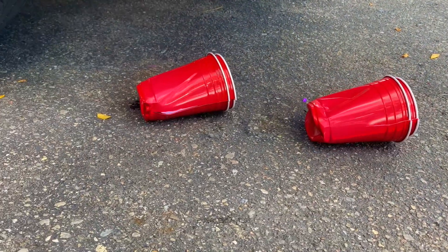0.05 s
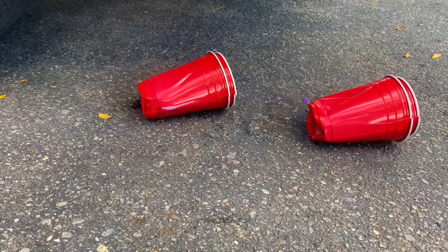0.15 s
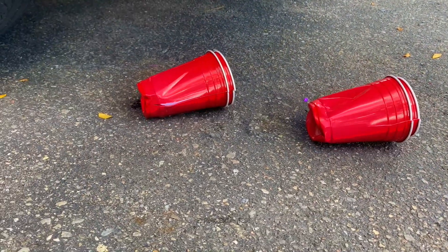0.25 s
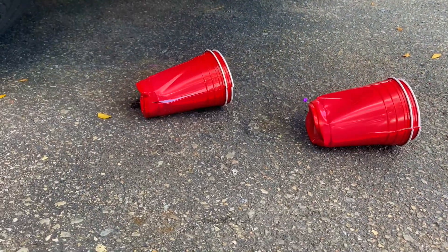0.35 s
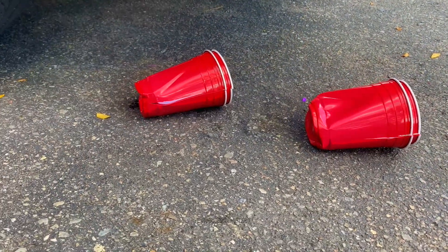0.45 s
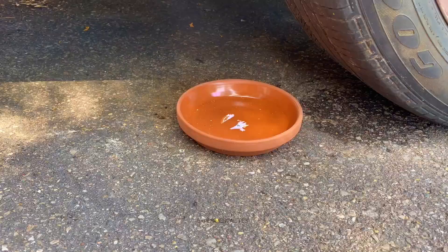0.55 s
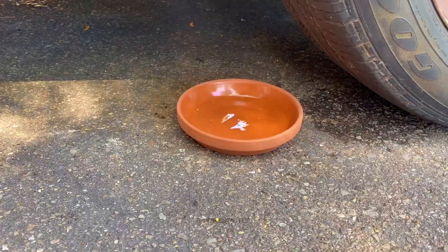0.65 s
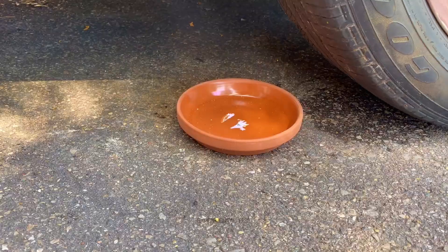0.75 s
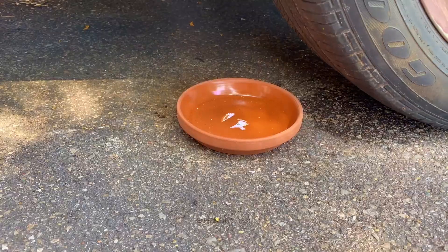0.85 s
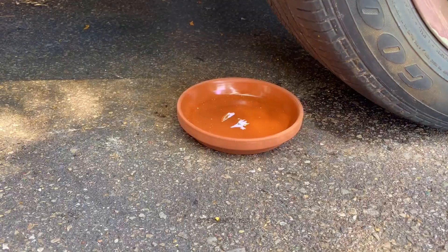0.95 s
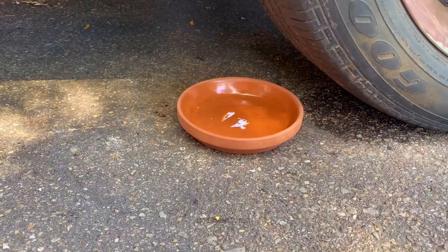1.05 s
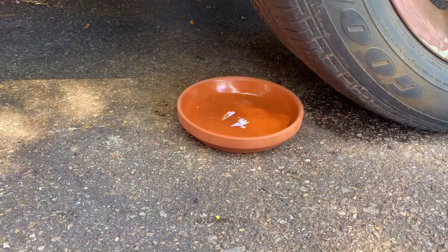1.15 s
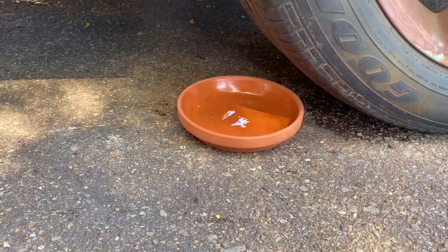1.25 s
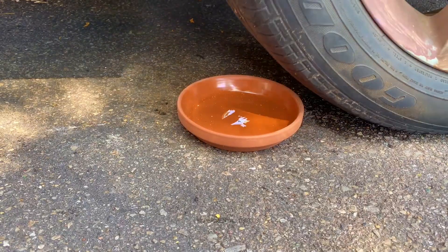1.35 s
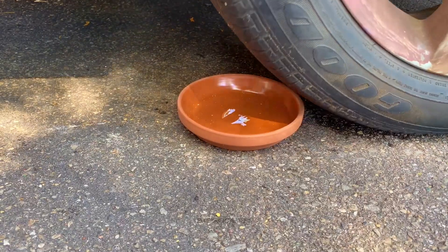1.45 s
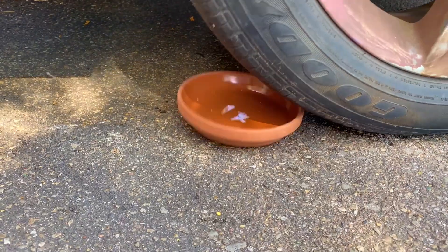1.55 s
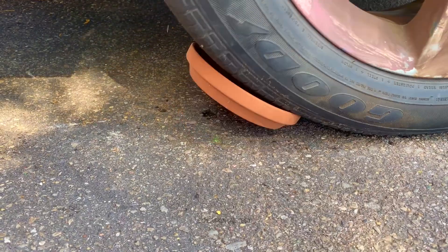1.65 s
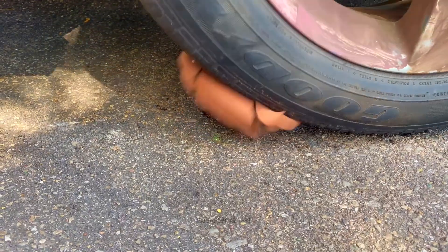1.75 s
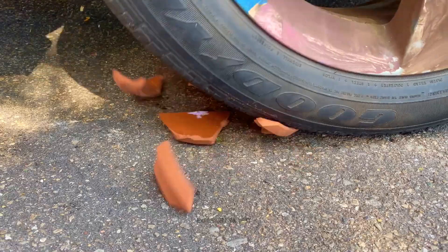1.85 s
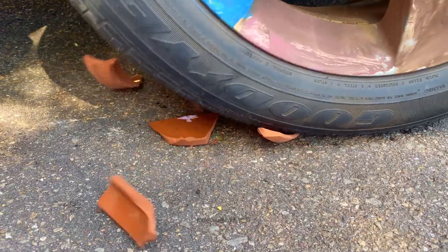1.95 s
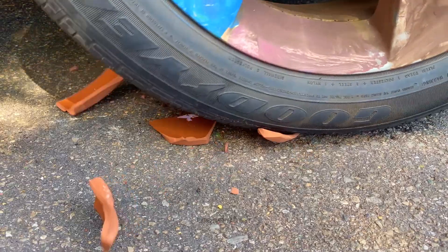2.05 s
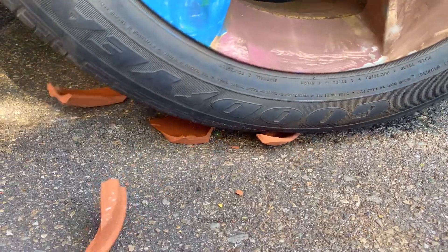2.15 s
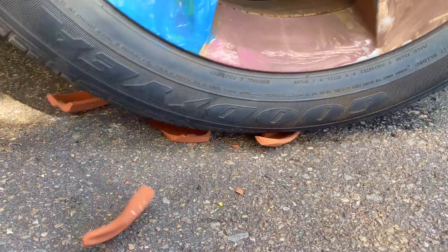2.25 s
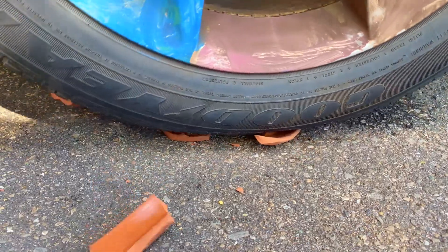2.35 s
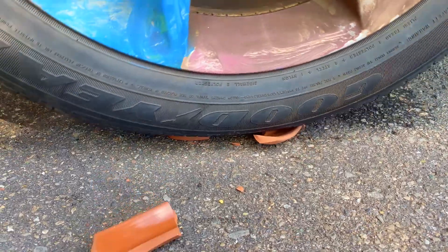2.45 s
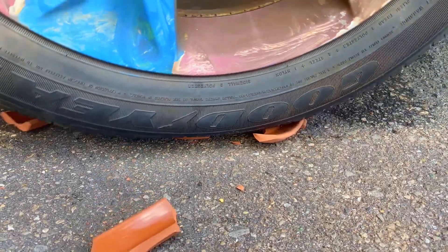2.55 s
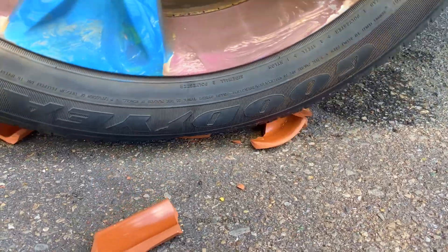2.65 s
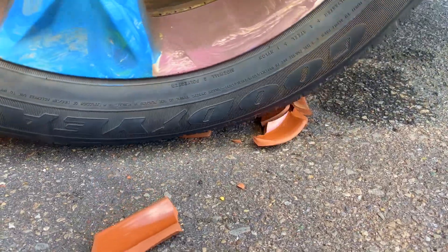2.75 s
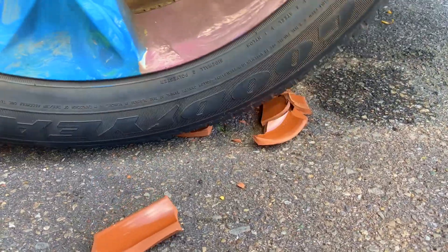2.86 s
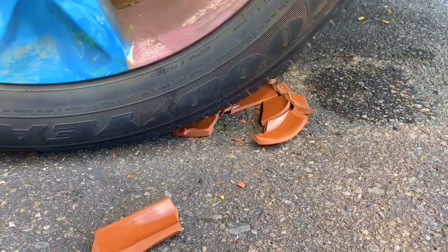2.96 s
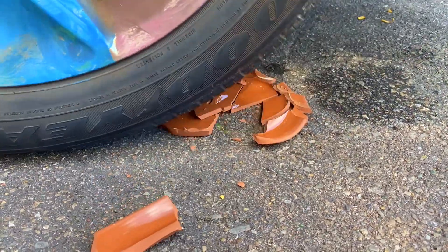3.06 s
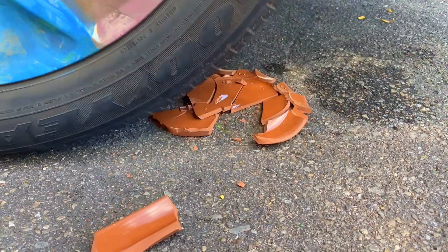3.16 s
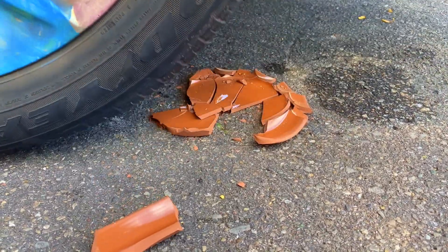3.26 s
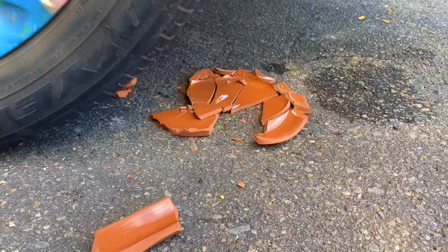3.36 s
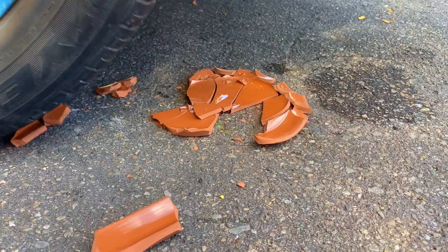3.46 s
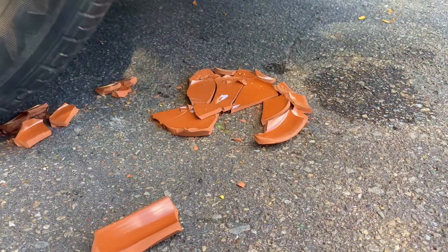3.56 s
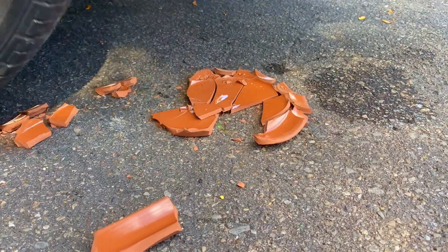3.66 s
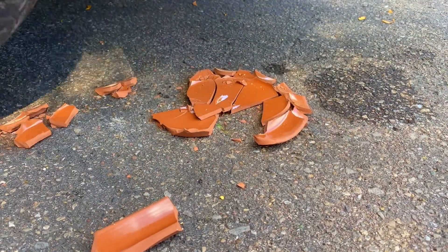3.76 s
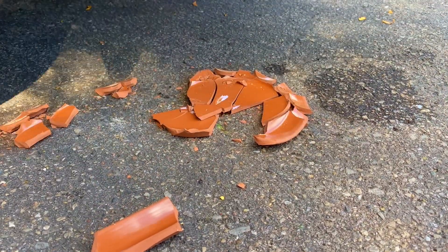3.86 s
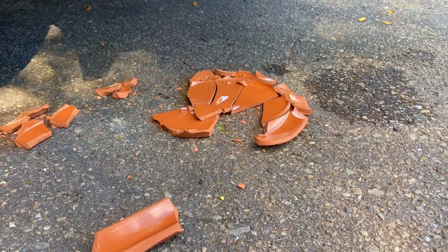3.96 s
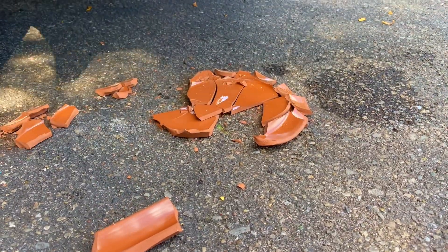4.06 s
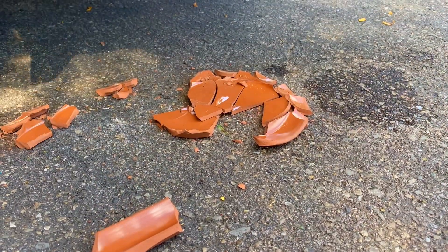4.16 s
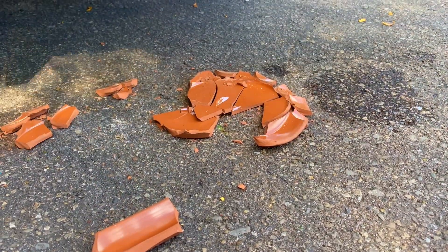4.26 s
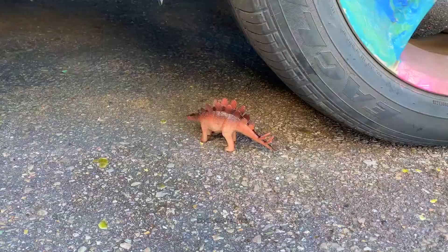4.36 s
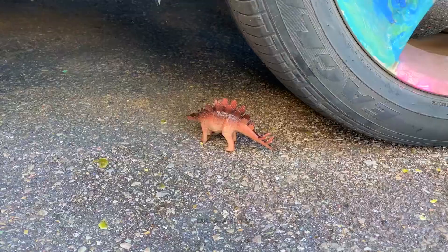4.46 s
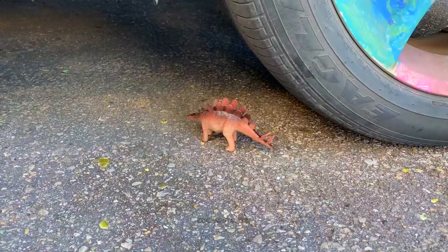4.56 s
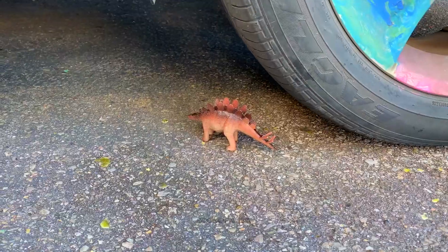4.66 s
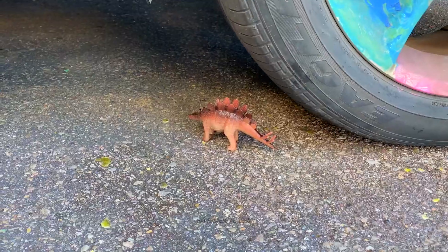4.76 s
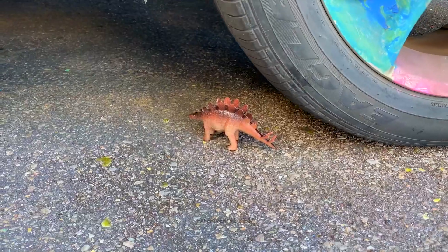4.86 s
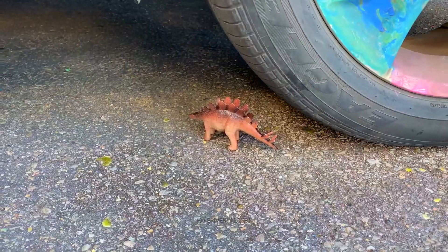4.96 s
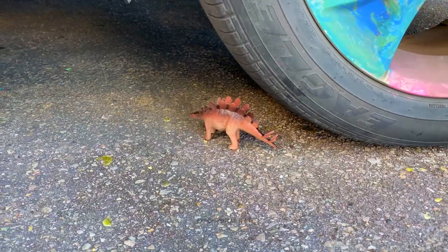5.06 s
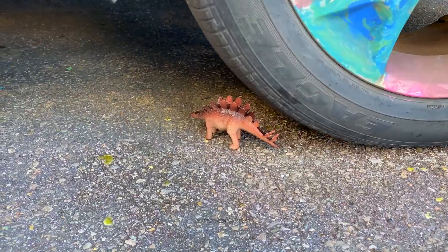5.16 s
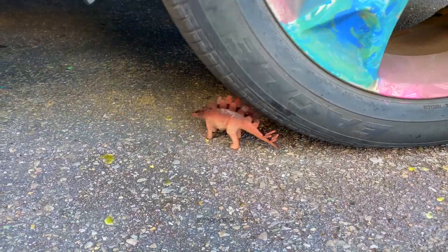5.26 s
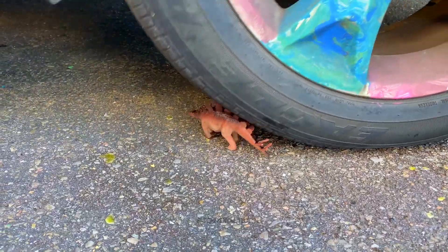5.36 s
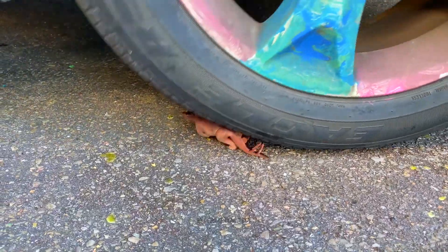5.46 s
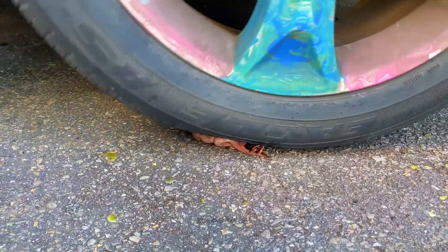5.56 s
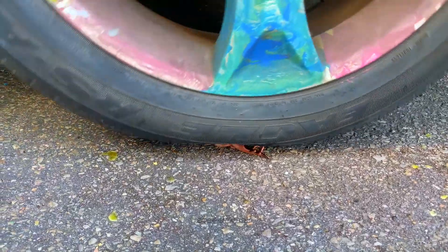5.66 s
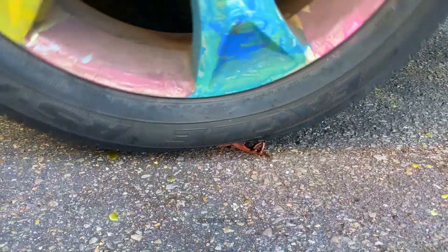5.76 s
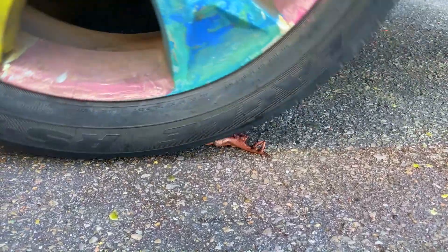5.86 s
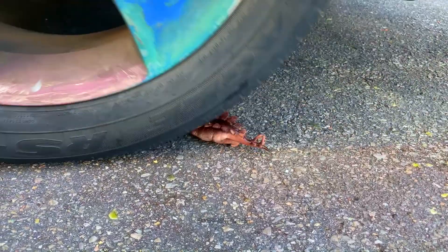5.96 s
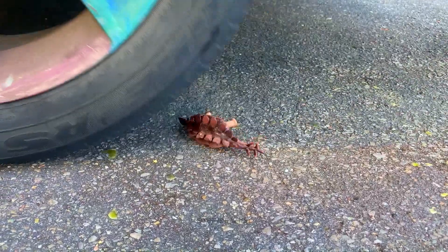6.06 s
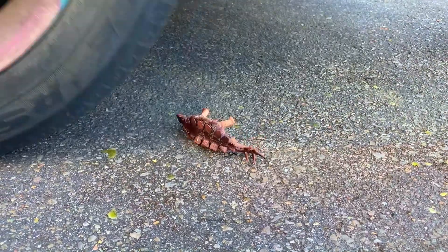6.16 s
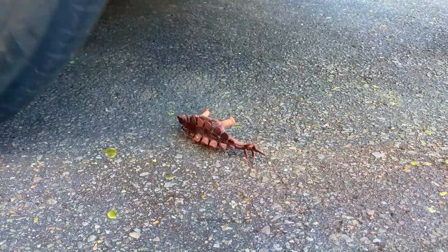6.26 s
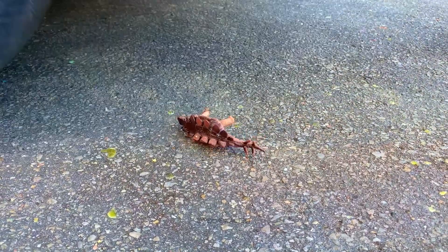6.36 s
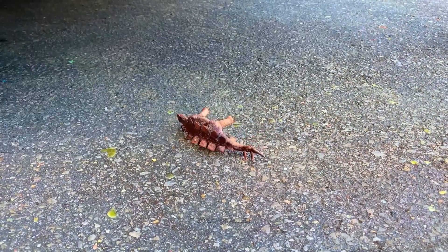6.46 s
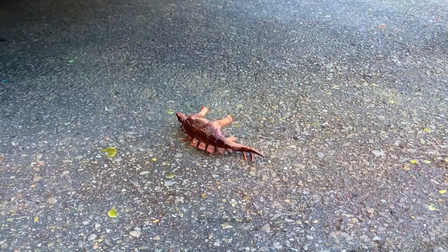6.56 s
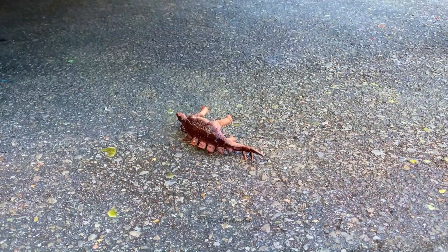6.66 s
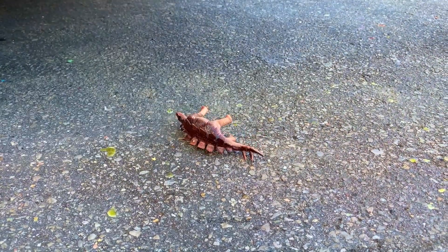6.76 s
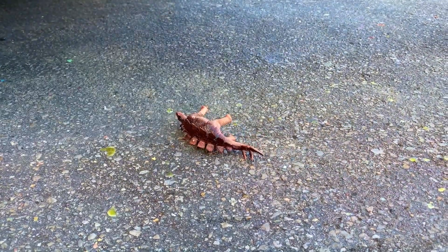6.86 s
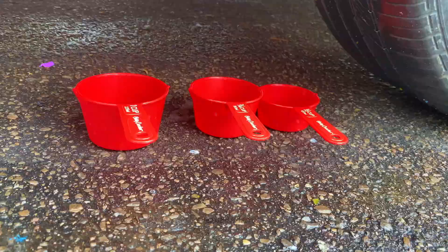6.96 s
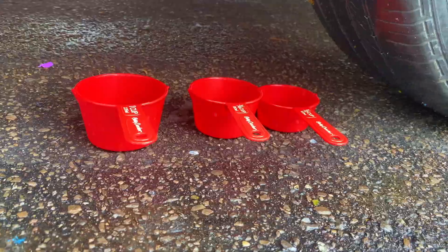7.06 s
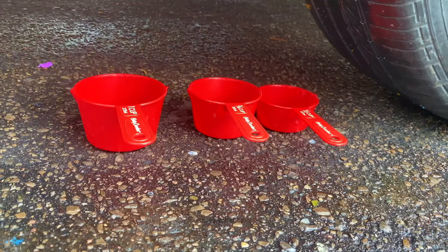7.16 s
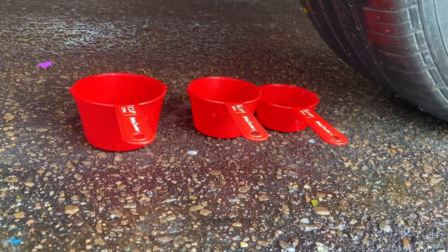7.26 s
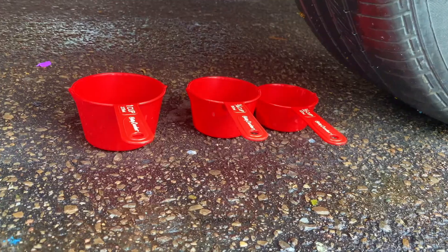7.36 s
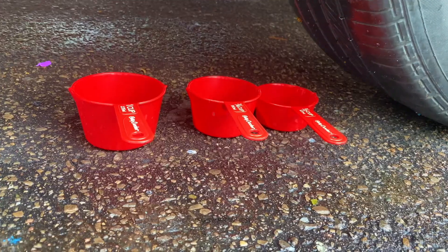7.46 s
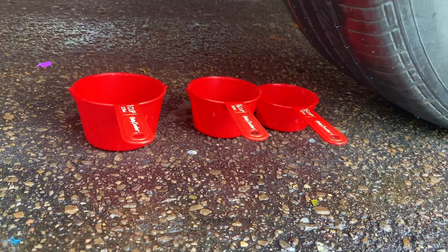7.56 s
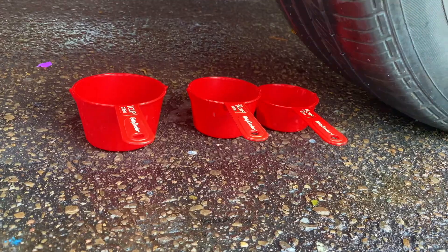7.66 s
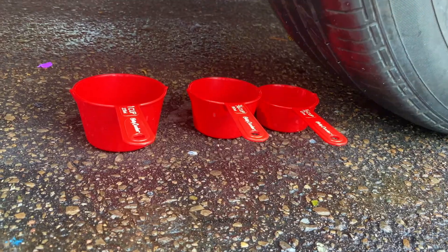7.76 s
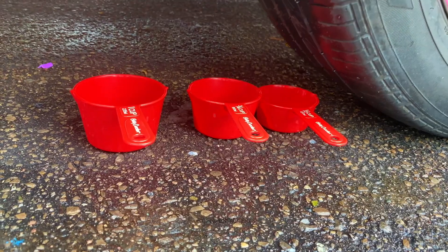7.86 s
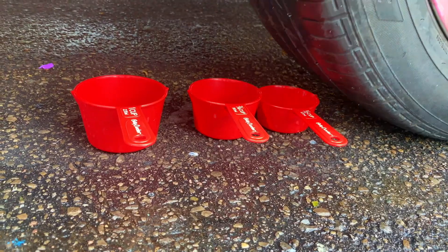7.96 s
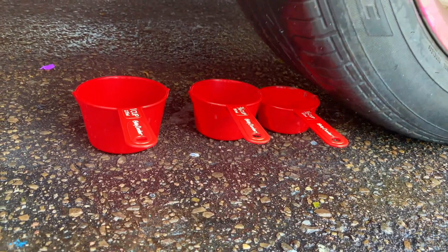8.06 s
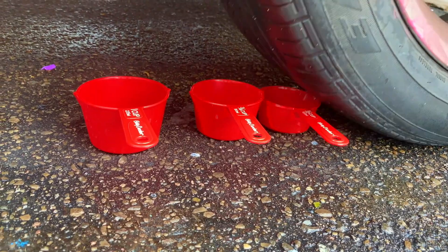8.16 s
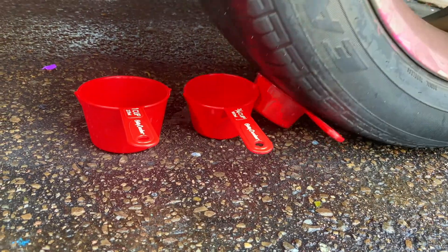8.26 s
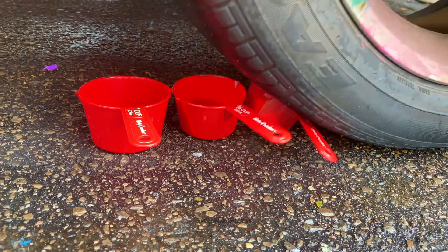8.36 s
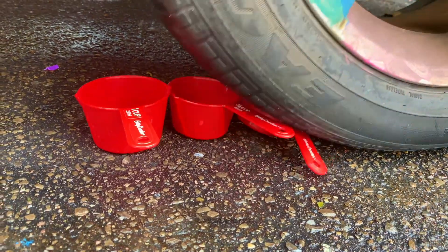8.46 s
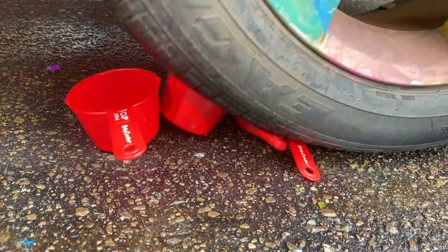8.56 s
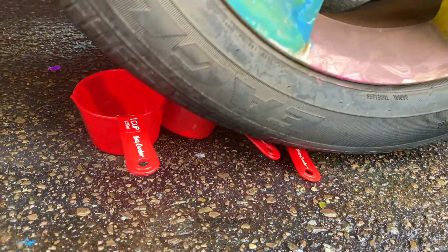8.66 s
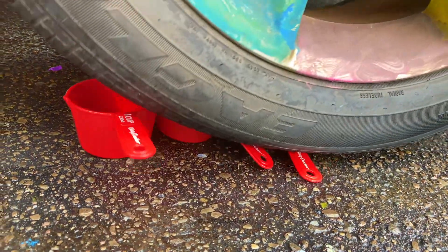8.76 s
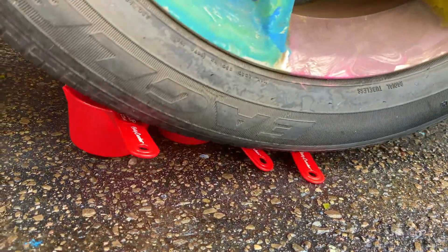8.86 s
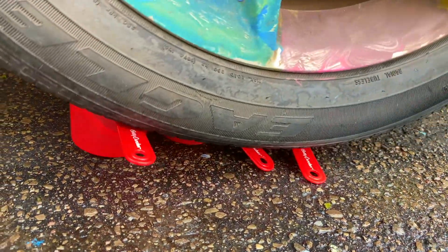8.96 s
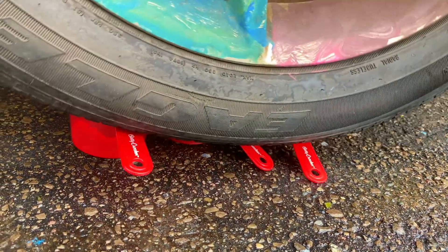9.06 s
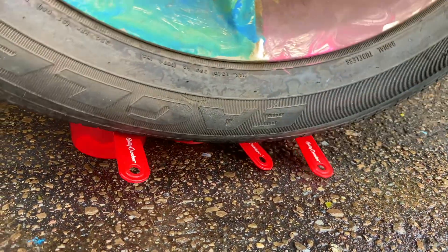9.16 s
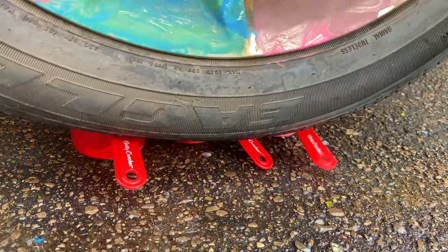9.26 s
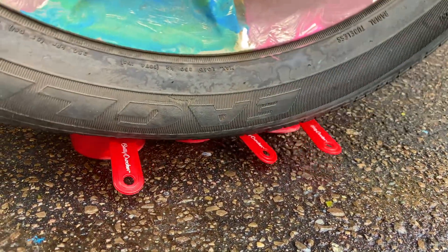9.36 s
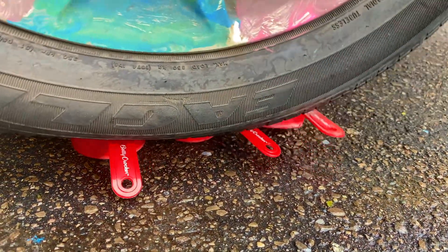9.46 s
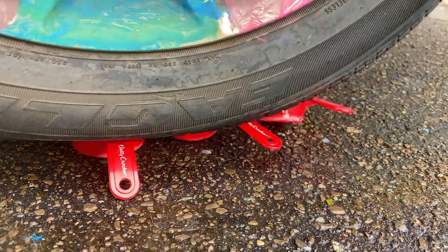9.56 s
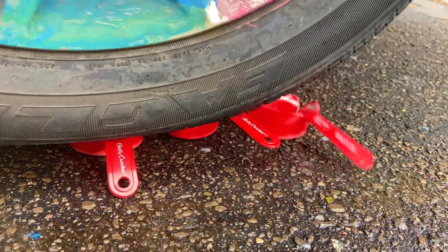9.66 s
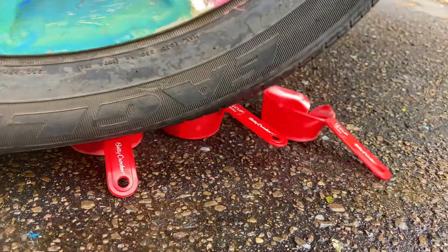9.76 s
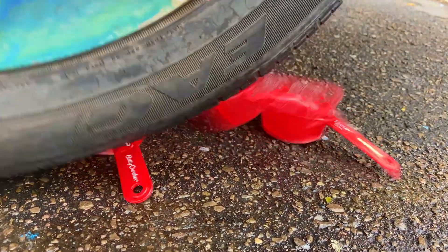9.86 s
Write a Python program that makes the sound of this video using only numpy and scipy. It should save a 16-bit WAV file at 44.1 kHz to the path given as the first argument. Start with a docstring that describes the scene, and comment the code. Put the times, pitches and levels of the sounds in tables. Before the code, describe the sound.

Close-up crushing on asphalt: brittle pottery snaps and crunches under a tyre, engine briefly revs, then hard plastic cups crack, creak and burst.

```python
"""Car crushing a saucer and plastic cups

A car creeps over a terracotta saucer, a soft toy and plastic measuring cups on asphalt, heard from close by.
Each fracture is a sharp snap plus a hollow knock; shards ring, cups creak, and the air inside the tyre hums.
The engine is summed from tones that follow the crankshaft, with hiss, rumble and a throttle-driven roar.
The car's levels jump between separate views of it; big breaks and puffs of air overload the microphone."""
import sys
import numpy as np
from scipy import signal
from scipy.fft import rfft, irfft, next_fast_len
from scipy.io import wavfile
from scipy.ndimage import uniform_filter1d

SR = 44100
rng = np.random.default_rng(int(sys.argv[2]) if len(sys.argv) > 2 else 0)


def unload_audio(sound):
    """Save the sound as a 16-bit wav file, at the path given as the first command line argument."""
    columns = np.transpose(np.atleast_2d(sound))
    # keep every value between -1 and 1, then stretch to whole-number steps
    steps = np.round(np.clip(columns, -1, 1) * 32767)
    wavfile.write(sys.argv[1], SR, steps.astype(np.int16))


N = 437472
T = np.arange(N) / SR
TOP_HZ = 15900  # upper edge of the microphone; chance fragments stay below it too


def undb(db):
    """Turn decibels into a plain multiplier."""
    return 10 ** (np.asarray(db) / 20)


def unit(x):
    """Scale to an average strength (rms) of 1."""
    return x / np.sqrt(np.mean(x ** 2))


def add(out, s, x):
    """Mix x in from time s, in seconds."""
    i = int(s * SR)
    out[i:i + len(x)] += x[:N - i]


def fade(t60, size=22050):
    """Die away smoothly, falling 60 dB in t60 seconds."""
    return np.exp(-np.log(1000) * T[:size] / max(t60, .002))


def swell(middle, half):
    """A smooth rise to 1 and fall; half seconds from the middle it is at 37 percent."""
    return np.exp(-((T - middle) / half) ** 2)


def wander(rate, size=22050):
    """Smooth random drift with a spread near 1, from rate random points per second."""
    knots = rng.standard_normal(int(size / SR * rate) + 2)
    joined = np.interp(T[:size] * rate, np.arange(len(knots)), knots)
    return 1.25 * uniform_filter1d(joined, int(SR / rate / 2))


def colour(x, points):
    """Filter to the given (Hz, dB) outline without sounding before the input."""
    size = next_fast_len(len(x) + 2048)
    hz, db = np.transpose(points)
    outline_db = np.interp(np.log(np.fft.rfftfreq(size, 1 / SR) + 1), np.log(hz), db)
    # folding the cepstrum forwards in time gives the filter minimum phase
    cepstrum = irfft(np.log(undb(outline_db)), size)
    cepstrum[1:size // 2] *= 2
    cepstrum[size // 2 + 1:] = 0
    return irfft(rfft(x, size) * np.exp(rfft(cepstrum)), size)[:len(x)]


def response(points):
    """Short impulse response of a colour."""
    return colour(signal.unit_impulse(2048), points)


def noise(points, size=22050):
    """Coloured noise of rms 1."""
    return unit(colour(rng.standard_normal(size), points))


def through(x, body):
    """Pass x through a body whose response is scaled to keep the power of white noise."""
    return signal.fftconvolve(x, body / np.linalg.norm(body))[:len(x)]


def ring(modes, size=22050):
    """Sum dying sine tones, one for each way the struck body vibrates."""
    return sum(undb(db) * np.sin(2 * np.pi * hz * T[:size]) * fade(t60, size) for hz, db, t60 in modes)


def clicks(rate, spread_db, size=22050):
    """Random clicks, rate per second, a few much larger than the rest."""
    out, count = np.zeros(size), max(int(rate * size / SR), 1)
    place, side, rarity = rng.random((count, 3)).T
    level_db = spread_db * np.minimum(-np.log(1 - rarity), 4)
    out[(place * size).astype(int)] = np.sign(side - .5) * undb(level_db)
    return out


def burst(t60, rate=12000, spread_db=2.0, front=3.6, size=8192):
    """A crack: one firm click, then a dying run of tiny breaks."""
    tiny_breaks = unit(clicks(rate, spread_db, size))
    return (front * signal.unit_impulse(size) + tiny_breaks) * fade(t60, size)


def fragment(low_hz, high_hz, t60, count=9):
    """Impulse response of a chance fragment: a handful of short tones at random pitches."""
    place, db, life = rng.random((count, 3)).T
    hz = np.minimum(low_hz * (high_hz / low_hz) ** place, TOP_HZ)
    return ring(zip(hz, -10 * db, t60 * (.5 + life)), size=6000)


def snap(t60, body, ring_db):
    """A crack front, heard directly and through the piece that it splits."""
    front = burst(t60)
    return front + undb(ring_db) * through(front, body)


# presses on the accelerator to climb an object: middle_s, half_length_s, throttle (0 to 1)
PRESSES = [(5.284, .27, .95), (8.145, .3, 0.4)]


def throttle_amount():
    """Each press of the accelerator opens and closes the throttle smoothly."""
    return sum(depth * swell(s, half) for s, half, depth in PRESSES)


def crank_phase(throttle, idle_turns_per_s=15.7, rev_turns_per_s=31, flywheel_s=0.24, unsteady=0.096):
    """The crankshaft speeds up with the throttle, held back by the heavy flywheel, and turns unevenly."""
    lag = np.exp(-1 / (flywheel_s * SR))
    turns = idle_turns_per_s + rev_turns_per_s * signal.lfilter([1 - lag], [1, -lag], throttle)
    return 2 * np.pi * np.cumsum(turns * (1 + unsteady * wander(5.6, size=N))) / SR


# tones of the exhaust: multiple of crankshaft speed, level_db
ENGINE_ORDERS = [(1, -0.5), (2, 5.5), (3, -7), (4, -1), (5, -12), (6, -7.5), (8, -16), (10, -20.5),
                 (11, -10.5)]


def exhaust_pulses(phase):
    """The exhaust pulses are a sum of tones locked to the crankshaft."""
    # the pipe delays each tone differently: random starting phases smear the pulses
    return unit(sum(undb(db) * np.cos(k * phase + 2 * np.pi * rng.random()) for k, db in ENGINE_ORDERS))


# tone colour of the fan hiss: pitch_hz, level_db
HISS = [(53, -27.5), (90, -3), (172, 2.5), (244, -1), (284, 1), (488, -4), (804, 0.5), (896, -3),
        (1110, -3.5), (1470, -4), (1640, -7), (3430, -10.5), (3910, -16), (9110, -20.5), (16000, -43)]
# ringing of the car body: pitch_hz, level_db, t60_s
PANEL_MODES = [(840, -2, .025), (1077, 7, 0.021), (1410, 4, 0.024), (1410, -6, 0.12)]


def fan_hiss(phase, panel_db=-10, throb_db=1.23):
    """Fan hiss is coloured noise with ringing panels, and it throbs with each turn of the crankshaft."""
    panels = through(rng.standard_normal(N), ring(PANEL_MODES))
    return (noise(HISS, size=N) + undb(panel_db) * panels) * undb(throb_db * np.cos(phase))


# tone colour of the intake roar: pitch_hz, level_db
ROAR = [(29, -21), (50, 5), (91, -4.5), (141, -10.5), (223, -14), (277, -0.5), (439, -28.5), (559, -12),
        (973, -22.5), (1820, -17.5), (2010, -26.5), (2680, -21.5), (4240, -30.5), (8540, -34.5),
        (16000, -48)]


def intake_roar(intake_db=-8):
    """The intake is rushing noise plus noise rung through two low resonances."""
    intake = through(rng.standard_normal(N), ring([(306, 2.0, 0.42), (336, 6, .08)]))
    return noise(ROAR, size=N) + undb(intake_db) * intake


# tone colour of the low rumble: pitch_hz, level_db
RUMBLE = [(11, -45), (18, 15), (44, -17.5), (80, -22), (97, -21.5), (113, -24), (130, -26), (170, -88.5),
          (290, -120)]
# base levels for each separate view of the car; they jump abruptly at each start:
# start_s, wheel_clear_s, fan_hiss_db, rumble_db, exhaust_db
VIEWS = [(0, 2, -55, -32, -57), (.52, 3.4, -51.5, -37, -53), (4.322, 6.2, -52, -34.5, -53.5),
         (6.93, 9.6, -50.5, -36.5, -51.5)]


def car(rumble_db=-7, roar_db=-39.5, shade_db=-6, shade_s=.25, exhaust_behind_db=3):
    """Engine pulses, rumble, fan hiss and intake roar; levels jump between views and shift as the wheel passes."""
    rows = np.array(VIEWS)
    _, clear, fan_db, low_db, exhaust_db = rows[np.searchsorted(rows[1:, 0], T)].T
    # 0 to 1 as the wheel passes: it hides the fan, and the exhaust is louder behind it
    behind = .5 + .5 * np.tanh((T - clear) / shade_s)
    throttle = throttle_amount()
    phase = crank_phase(throttle)
    exhaust = undb(exhaust_db + exhaust_behind_db * behind) * exhaust_pulses(phase)
    hiss = undb(fan_db + shade_db * behind) * fan_hiss(phase)
    roar = undb(roar_db) * throttle * intake_roar()
    rumble = undb(low_db + rumble_db) * noise(RUMBLE, size=N)
    return exhaust + hiss + rumble + roar


# cups taking the load: start_s, wall_pitch_hz at that moment
SQUEEZES = [(0, 960), (8.1, 1120), (8.37, 1023), (8.53, 889), (9.15, 1207)]


def wall_pitch(t, sag_hz_per_s=180):
    """Pitch of the cup under the tread: it sinks steadily from the start of each squeeze as the cup folds."""
    start, hz = np.transpose(SQUEEZES)
    k = np.searchsorted(start[1:], t)
    return hz[k] - sag_hz_per_s * (t - start[k])


# cup wall resonances: multiple of wall pitch, width_hz, level_db
CUP_WALL = [(0.998, 71, 6), (.8, 114, 12.5), (1.2, 110, -14.5), (1.5, 90, -32), (1.9, 80, -54),
            (2.6, 60, -17)]


def cup_wall(hz):
    """Impulse response of a cup wall damped by the rubber: the wider a resonance, the faster it dies."""
    return ring([(k * hz, db, np.log(1000) / np.pi / width) for k, width, db in CUP_WALL], size=3000)


# tone colour of knocks, in plastic and terracotta alike: pitch_hz, level_db
KNOCK = [(60, -20.5), (200, -9.5), (400, -7.5), (650, 1), (920, 5.5), (1150, -1), (1600, -4.5), (2500, -21),
         (4000, -26.5), (9000, -35.5)]
# plastic buckling and splitting: start_s, knock_db, snap_db, knock_t60_s
CUP_CRACKS = [ (0.12, -37.5, -51, 0.12), (8.11, -32.5, -24, 0.086), (8.129, -24, -19, 0.074),
              (8.176, -7, -26, 0.048), (8.232, 0, -21, 0.019), (8.339, -25.5, -36, 0.15),
              (8.3755, 14.5, 4, 0.064), (8.468, -11.5, -28.5, 0.12), (8.509, -5, -33, 0.054),
              (8.522, -13.5, -30, 0.075), (8.618, -23.5, -40.5, 0.14), (8.684, -46, -32.5, 0.062),
              (8.728, -19, -46, 0.046), (8.749, -19.5, -41, 0.043), (8.769, -25.5, -44.5, 0.076),
              (9.201, -26, -45, 0.054), (9.267, -51, -34, 0.046), (9.432, -23.5, -43, 0.071),
              (9.479, -35, -56, 0.25), (9.569, -25, -20.5, 0.053), (9.622, -22.5, -27, 0.044),
              (9.640, -20, -19.5, 0.12), (9.654, -19.5, -55, 0.26), (9.688, -37, -36, 0.082),
              (9.717, -32, -28.5, 0.086), (9.758, -21, -33, 0.016), (9.806, 14, 12, 0.11),
              (9.828, 15, 16, 0.015), (9.847, 6.5, 9, 0.009), (9.87, -12, -1, 0.046),
              (9.891, -2, -20, 0.043), (9.914, 14, -1, 0.047)]


def cups(snap_share=0.47, road_db=-10, plastic_t60=0.045, plastic_db=-10, wall_scatter=0.0335):
    """Cup walls buckle with a snap, a hollow ring and a knock on the road."""
    walls, snaps, knocks = np.zeros((3, N))
    for s, knock_db, snap_db, t60 in CUP_CRACKS:
        # each buckle misses the wall pitch by a small random share
        hz = wall_pitch(s) * (1 + wall_scatter * rng.standard_normal())
        splinter = fragment(1208.5, 6000, plastic_t60)
        add(walls, s, undb(knock_db) * through(burst(t60), cup_wall(hz)))
        add(knocks, s, undb(knock_db + road_db) * burst(t60))
        add(snaps, s, undb(snap_db) * snap(t60 * snap_share, splinter, plastic_db))
    hollow = colour(walls, [(200, -12.0), (750, -6.5), (3000, 4), (8000, -18.0)])  # small cups radiate little bass
    bright = response([(200, -2), (1000, 3.0), (2800, 5.0), (5000, 2.0), (9000, 3), (16000, -16)])
    return hollow + through(snaps, bright) + through(knocks, response(KNOCK))


# air inside the tyre: pitch_hz, level_db, t60_s
TYRE_AIR = [(190.2, 2.5, 0.92), (105.5, -7.5, 0.51)]


def tyre(hum_db=-28, thud_db=-19, thud_t60=0.13, cup_db=-3, most_db=4):
    """The tyre drops a little at each break: the knock thuds in rubber, the snap sets the air inside ringing."""
    hum, thud = np.zeros((2, N))
    air, settle = ring(TYRE_AIR), fade(thud_t60)
    for cracks, drop_db in ((CLAY_CRACKS, 0), (CUP_CRACKS, cup_db)):
        for s, knock_db, snap_db, _ in cracks:
            add(hum, s, undb(min(snap_db, most_db) + hum_db) * air)  # the tyre can drop only so far
            add(thud, s, undb(knock_db + drop_db + thud_db) * settle)
    rubber = noise([(25, -12), (60, -2.5), (120, -1.5), (260, -4.5), (700, -22.5), (3000, -70.5)], size=N)
    return hum + thud * rubber


# the car's weight rolling over grit and debris: middle_s, half_length_s, grinding_db
LOADS = [(2.296, 0.17, -25.5), (2.904, 0.29, -38.5), (7.6, 0.43, -69.5), (8.5, .22, -41),
         (9.673, 0.19, -46.5)]


def grinding(crumb_db=-37.5, crumb_t60=0.37):
    """Strength of the crackle: it follows the weight on the debris, and each break sheds fresh crumbs."""
    power = sum((undb(db) * swell(s, half)) ** 2 for s, half, db in LOADS)
    for s, knock_db, *_ in CLAY_CRACKS + CUP_CRACKS:
        add(power, s, (undb(knock_db + crumb_db) * fade(crumb_t60)) ** 2)
    return np.sqrt(power)


# light ticks of grit and toy under the tread: start_s, level_db, centre_hz
TICKS = [(3.424, -42, 7700), (3.451, -46, 8140), (3.682, -43.5, 3040), (5.79, -51, 4000),
         (5.93, -44.5, 4900), (6.311, -45.5, 827), (7.781, -45, 1500), (9.033, -42.5, 1800)]


def grit(knock_db=-4, snap_db=-6, tick_t60=0.054):
    """Crumbs and road grit crackle under the weight; light ticks sound softly in a narrow band."""
    dull = through(unit(clicks(706, 5.8, size=N)), response(KNOCK))
    # three sets of clicks, each ringing its own chance fragment
    sharp = sum(through(clicks(250, 3.2, size=N), fragment(2000, 18000, 0.0051, count=14)) for _ in range(3))
    out = grinding() * (undb(knock_db) * dull + undb(snap_db) * unit(sharp))
    for s, db, hz in TICKS:
        band = [(hz / 4, -45), (hz / 2, -18), (hz, 0), (2 * hz, -18), (4 * hz, -50)]
        add(out, s, undb(db) * through(burst(tick_t60), response(band)))
    return out


# saucer tipped by the tread, scuffing on the road: start_s, level_db, t60_s
SCUFFS = [(1.489, -13.5, 0.024), (1.517, -33.5, 0.064), (1.536, -20, 0.061), (1.555, -26, 0.08),
          (1.574, -13.5, 0.036)]
# tone colour of the scuffs: pitch_hz, level_db
SCUFF = [(150, -25.5), (600, -4), (850, 12.5), (1100, 6.5), (1300, -4.5), (1530, 5.5), (1900, -5.5),
         (3000, -11.5), (5000, -22), (14000, -39)]
# terracotta fractures: start_s, knock_db, snap_db, knock_t60_s
CLAY_CRACKS = [ (1.706, 5, 3, 0.15), (1.742, -6, 7.5, 0.073), (1.78, -0.5, -5, 0.037),
               (1.861, 3.5, 1.5, 0.059), (1.879, -2.5, 8, 0.022), (1.908, -2.5, 6, 0.034),
               (1.942, -13, -12.5, 0.032), (2.019, -9, -4, 0.031), (2.051, -0.5, -1.5, 0.039),
               (2.132, -5.5, -8, 0.0089), (2.166, -7, -12, 0.015), (2.225, -16, -13.5, 0.025),
               (2.234, 1, -3, 0.043), (2.256, -4.5, -19, 0.034), (2.286, -11.5, -7, 0.047),
               (2.331, -4, 2.5, 0.025), (2.386, -12, -6.5, 0.043), (2.414, -5, -15.5, 0.055),
               (2.443, 0, 0, 0.037), (2.565, -19, -23, 0.013), (2.579, -11.5, -4.5, 0.012),
               (2.618, -10.5, -1, 0.008), (2.675, -1.5, -12, 0.052), (2.703, -19.5, -22.5, 0.039),
               (2.782, -6, -18, 0.052), (2.792, -45, -14.5, 0.013), (2.872, -1, -7, 0.048),
               (2.913, 3, -6.5, 0.012), (3.005, -24.5, -24, 0.015), (3.021, -22.5, -20, 0.012),
               (3.042, 0.5, -11.5, 0.055), (3.103, -30, -23.5, 0.03), (3.149, -14.5, -14, 0.0062),
               (3.217, -29, -26.5, 0.015), (3.232, -33.5, -20, 0.0061), (3.262, -31, -26.5, 0.0073),
               (3.299, -27, -42, 0.014), (3.328, -38, -42, 0.074)]
# tone colour of terracotta snaps: pitch_hz, level_db
SNAP = [(200, -21), (1000, -12), (2800, 2.5), (4500, -4.5), (6000, -5), (8000, -4), (11000, -10.5),
        (16000, -11.5)]


def terracotta(snap_share=0.72, shard_t60=.022, shard_db=-7):
    """Each break snaps, rings its fragments and knocks in the wedge of air between tread and road."""
    knocks, snaps, scuffs = np.zeros((3, N))
    for s, knock_db, snap_db, t60 in CLAY_CRACKS:
        chunk = fragment(455, 1800, 0.027)
        shard = fragment(2000, 12000, shard_t60)
        add(knocks, s, undb(knock_db) * snap(t60, chunk, ring_db=-18.5))
        add(snaps, s, undb(snap_db) * snap(t60 * snap_share, shard, shard_db))
    for s, db, t60 in SCUFFS:
        add(scuffs, s, undb(db) * burst(t60))
    return through(knocks, response(KNOCK)) + through(snaps, response(SNAP)) + through(scuffs, response(SCUFF))


# what each named piece rings with: pitch_hz, level_db, t60_s
MODES_OF = { "saucer": [(1030, -3.5, 0.023), (1380, 7.5, 0.039), (1482, -24.5, 0.029), (2272, -6.5, 0.16),
            (3100, -6.5, 0.055), (5850, -33, 0.11)], "glaze": [(2282, 2.5, 0.057), (3906, -5, 0.09),
            (5100, -23, 0.0524), (7990, -20, 0.04), (8720, -8.5, .04), (11980, -16, .08),
            (12910, -15.5, 0.072)], "rim": [(2835, -12, .4), (3622, -1, 0.35), (3510, -10.5, 0.14),
            (4297, -22, .5), (4648, -13, 0.4), (5570, -15, .3), (6750, -17, .15), (9100, -16, 0.18),
            (10380, -11.5, 0.25)], "base": [(2743, -1, 0.45), (2600, -9.5, 0.11), (6445, -2.5, .11),
            (8436, -11.5, 0.16)], "wedge": [(5600, -1.5, 0.18), (8370, -17, 0.15)],
            "sliver": [(5410, -10.5, 0.22), (7660, -12, 0.15), (9900, 8.5, 0.049), (12800, -21, .12)],
            "chip": [(3540, 14, 0.03), (7050, -9, 0.054), (9000, -17, 0.11)], "flake": [(2620, 3, 0.014),
            (2800, 1, 0.039), (4670, -15, 0.07), (7460, -15, 0.074)], "cup": [(1020, 5.5, 0.22),
            (2850, -6.5, 0.099), (4130, -20, 0.25)], "handle": [(1410, -3, 0.09), (1805, 6.5, 0.042),
            (2690, -12, .07), (3470, -13, 0.12), (5500, -3, 0.034)]}
# pieces struck or sprung free: start_s, piece name, level_db
RINGS = [(1.4895, "saucer", -21), (1.511, "glaze", -30.5), (1.533, "glaze", -24), (1.575, "glaze", -28),
         (1.708, "rim", 3), (1.776, "base", -3.5), (1.822, "rim", -14), (1.909, "rim", -14),
         (2.253, "wedge", -7.5), (2.443, "sliver", -0.5), (2.580, "flake", -15.5), (2.703, "flake", -17),
         (2.754, "chip", -18.5), (2.866, "flake", -22.5), (8.133, "cup", -23), (8.180, "cup", -17.5),
         (9.623, "handle", -23.5), (9.847, "chip", -10.5), (9.868, "handle", -5)]


def pieces(rock_rate=130, rock_db=2.0, rock_phase=0.53, contact_s=0.00015):
    """Loose pieces ring; they tumble and rub, so each tone wavers on its own in phase and level."""
    out, t = np.zeros(N), T[:SR // 2]
    attack = 1 - np.exp(-t / contact_s)
    for s, piece, db in RINGS:
        for hz, mode_db, t60 in MODES_OF[piece]:
            tone = np.sin(2 * np.pi * hz * t + rock_phase * wander(rock_rate))
            level = undb(db + mode_db + rock_db * wander(rock_rate))
            add(out, s, level * tone * attack * fade(t60))
    return out


# air squeezed from under the tread:
# start_s, pressure (1 = full scale, sign = direction, before the microphone limits it), decay_s
PUFFS = [(1.737, 0.96, 0.061), (1.88, -0.3, 0.14), (2.233, -0.51, 0.12), (2.331, -0.43, 0.18),
         (2.87, 0.46, 0.18), (3.044, -0.2, 0.052), (8.375, -0.49, 0.19), (9.801, -2.1, 0.0062)]


def puffs(swing_hz=2.6, rise_s=0.001):
    """A gust at the microphone: a quick push that swings slowly back."""
    out, t = np.zeros(N), T[:SR]
    for s, pressure, decay in PUFFS:
        push = (1 - np.exp(-t / rise_s)) * np.exp(-t / decay)
        add(out, s, pressure * push * np.cos(2 * np.pi * swing_hz * t))
    return out


# cup walls squeaking on rubber: start_s, length_s, level_db
CREAKS = [(8.127, 0.082, -25), (8.181, 0.045, -18.5), (8.397, 0.031, -17.5), (8.436, 0.041, -15.5),
          (8.461, 0.04, -19), (8.51, 0.02, -8), (8.531, .19, -42), (8.751, 0.056, -35.5),
          (9.869, 0.028, -27)]


def creaks(slip_rate=380, jitter=0.06, rough_db=4.5, octave_db=-27):
    """Plastic sticks and slips on rubber: a rough squeak that sinks as the wall folds."""
    out = np.zeros(N)
    for s, length, db in CREAKS:
        along = np.minimum(T[:SR // 2] / length, 1)  # 0 to 1 through the creak
        hz = wall_pitch(s + length * along) * (1 + jitter * wander(slip_rate))
        phase = 2 * np.pi * np.cumsum(hz) / SR
        tone = unit(np.sin(phase) + undb(octave_db) * np.sin(2 * phase))
        grip = np.sqrt(np.sin(np.pi * along).clip(0)) * undb(rough_db * wander(slip_rate))
        add(out, s, undb(db) * grip * tone)
    return out


def driveway(x, wet_db=-23, t60=0.23):
    """Faint scatter from the underside of the car and the yard: a noise tail that builds, then dies."""
    scatter = noise([(100, 1.5), (900, -9.0), (3000, -4.5), (8000, -8.0), (16000, -29.0)])
    tail = scatter * fade(t60) * (1 - fade(0.09))
    return x + undb(wet_db) * through(x, tail)


def scene():
    """Everything that breaks sounds in the yard; the tyre, the car and the gusts lie under it."""
    crushing = terracotta() + cups() + creaks() + pieces() + grit()
    return (driveway(crushing) + tyre() + puffs() + car())[None]


def record(dry, ceiling=0.43, knee=4.5, top_db=-2):
    """The microphone saturates on the big breaks; its treble is rounded off, then cut above TOP_HZ."""
    held = dry / (1 + np.abs(dry / ceiling) ** knee) ** (1 / knee)
    held = colour(held[0], [(5000, 0), (15000, top_db)])[None]
    return signal.sosfilt(signal.ellip(10, .2, 80, TOP_HZ, fs=SR, output="sos"), held)


dry = scene()
out = record(dry)
unload_audio(out)
```